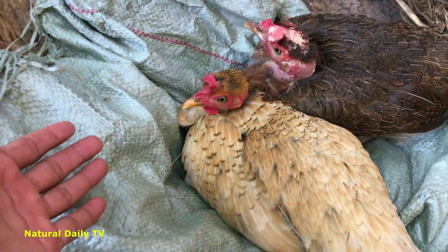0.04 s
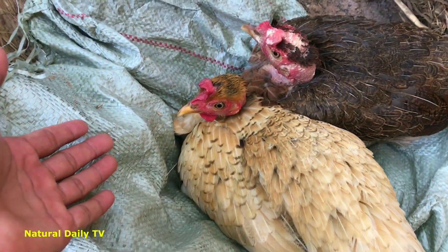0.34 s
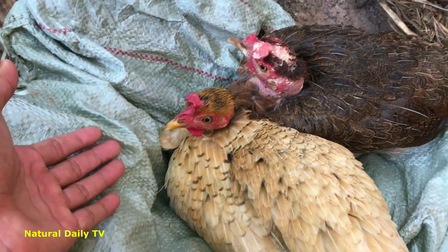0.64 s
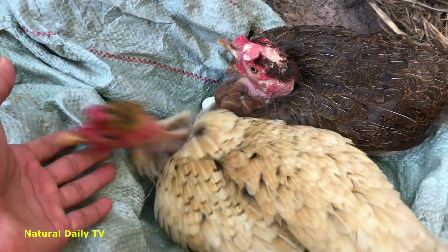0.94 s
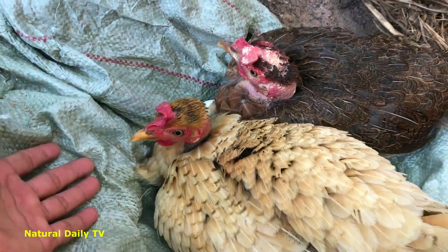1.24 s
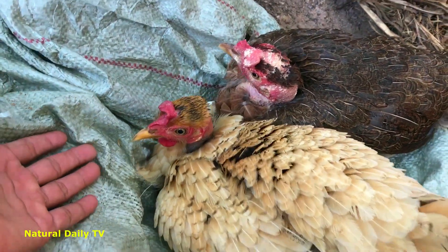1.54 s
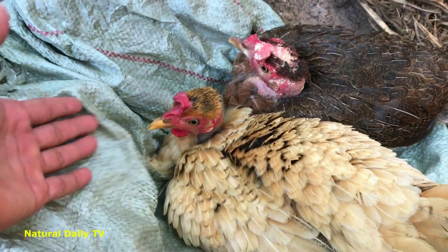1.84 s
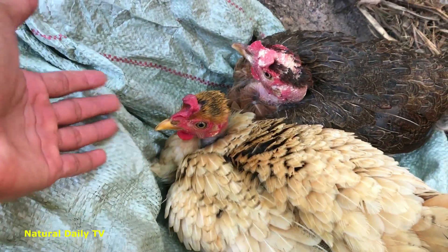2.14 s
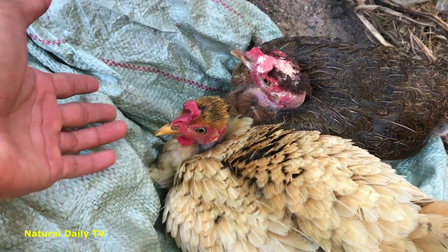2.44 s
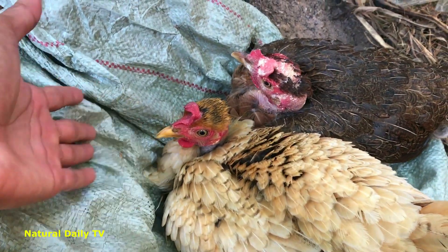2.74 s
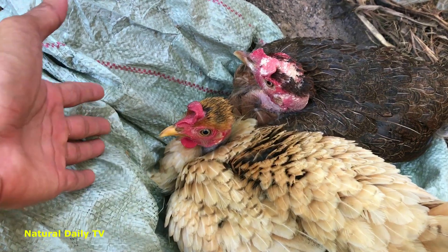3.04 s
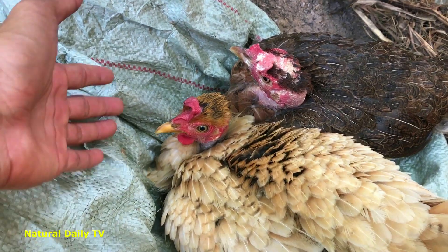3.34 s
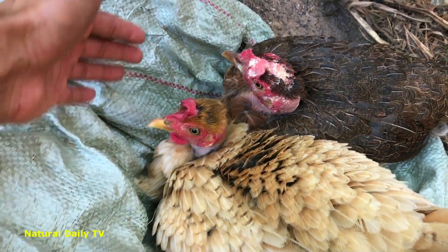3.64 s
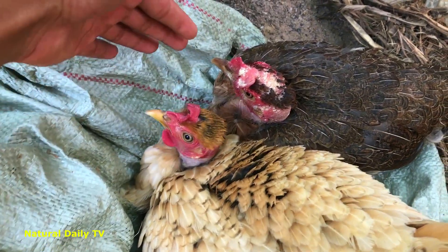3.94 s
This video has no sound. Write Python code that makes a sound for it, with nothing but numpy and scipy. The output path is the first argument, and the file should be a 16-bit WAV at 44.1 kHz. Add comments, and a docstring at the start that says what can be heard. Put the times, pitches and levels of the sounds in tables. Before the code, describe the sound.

Rattling, clucking calls from a hen, with a plastic sack faintly crinkling outdoors.

```python
"""Outdoors, on a woven plastic sack, a sitting hen grumbles at a hand held close to her.
Her phrases open with short whistled clucks and break into rattles: a whistle chopped some
53 times a second, with a snap at each opening. Between phrases she draws air.
The sack rustles, scrapes and ticks under her, over a low outdoor rumble."""
import sys
import numpy as np
from scipy import signal
from scipy.fft import rfft, irfft, next_fast_len
from scipy.io import wavfile
from scipy.ndimage import map_coordinates

SR = 44100
rng = np.random.default_rng(int(sys.argv[2]) if len(sys.argv) > 2 else 0)


def int16_out(signal):
    """Quantize to a 16-bit WAV file."""
    q = np.round(np.clip(np.atleast_2d(signal).T, -1, 1) * 32767)
    wavfile.write(sys.argv[1], SR, q.astype(np.int16))


N = 176400
T = np.arange(N) / SR

EDGE_S, JITTER_S = 0.00301, 0.000696  # a pulse's fade in and out; its uneven timing
OPEN_SHARE, SECOND_SNAP_AT, SQUEAK_AT = 0.916, 0.48, 0.68  # shares of one pulse
SNAP_DB, RASP_DB, CHIRP_DB, SQUEAK_DB = 20.5, -1.5, 4.5, -0.5  # compared with the pulse
# Runs of quick pulses: t/s, length/s, pulse rate/Hz, whistle f/Hz, start, middle and end level/dB,
# start and end harshness (0 to 1), feed to the throat's high notes/dB
RATTLES = [ (.000, 0.079, 56.4, 693, -42.5, -46.5, -55, 0.31, 1, -7),
           (0.093, 0.083, 60, 690, -50, -47, -46.5, 0.44, 0.97, -2),
           (0.448, 0.074, 53, 698, -41.5, -44.5, -54.5, 0.26, 1, -6),
           (0.523, 0.14, 53, 662, -50, -46.5, -49, 0.76, 0.75, 0.5),
           (0.927, 0.043, 33, 726, -41, -56, -50, 0.2, 0.9, 1),
           (1.613, 0.039, 40, 746, -46.5, -65, -36, 1, 0.61, 0),
           (1.71, 0.072, 52.5, 710, -41, -45.5, -38.5, 0.7, 0.4, -6),
           (1.789, 0.035, 58.4, 712, -43, -38.5, -35.5, 0.2, 0.37, -8),
           (1.829, 0.045, 55, 730, -42, -35.5, -46, 0.12, 0.78, -5),
           (2.186, 0.0275, 50, 746, -55, -65, -55, 0.32, .4, -12),
           (2.416, 0.064, 51, 742, -44.5, -37, -39, 0.25, 0.4, -3),
           (2.513, .022, 58, 860, -50, -63, -53, 0.27, 0.2, -7),
           (2.542, 0.041, 56.4, 696, -42.5, -37, -39.5, 0.28, 0.32, -9.5),
           (2.621, 0.062, 54, 688, -48.5, -37.5, -43, 0.37, 0.43, -5),
           (2.702, 0.0287, 41.4, 735.2, -46, -78, -41, 0, 0.3, -9),
           (2.756, 0.057, 58, 730, -43, -38, -45.5, 0.32, 0.56, -4.5),
           (3.393, 0.043, 25.9, 771.5, -48.5, -61, -47, 0.3, 0.53, -18),
           (3.467, 0.054, 58.4, 704, -43.5, -35.5, -42.5, 0.23, 0.38, -8),
           (3.561, 0.062, 56, 704, -46, -37.5, -40.5, 0.27, 0.41, -13),
           (3.84, 0.057, 56.8, 691, -41, -41, -39.5, 0.06, 0.17, -12),
           (3.915, 0.093, 58.7, 694.7, -47.5, -39, -43, 0.05, 0.46, -13)]
def rattles():
    """Each opening lets out a snap and a dipping whistle; harshness adds snap, chirps and rasp."""
    voice, low, high = np.zeros((3, N))
    for onset, length, rate, hz, *levels_db, harsh_from, harsh_to, high_db in RATTLES:
        t = T[:int(SR / rate)]
        for start in np.arange(0, length - EDGE_S, 1 / rate):
            # No two pulses are quite alike.
            late, loud, detune, bend, second_late, squeak_detune, *detunes = rng.standard_normal(8)
            at = onset + start + JITTER_S * late
            harsh = np.interp(start / length, [0, 1], [harsh_from, harsh_to])
            level = amp(np.interp((start + t) / length, [0, .5, 1], levels_db) + 0.72 * loud)
            opening = level * gate(t, min(OPEN_SHARE / rate, length - start), EDGE_S)
            # The pitch starts high, settles, then lifts as the pulse closes.
            settle = 0.3 * np.exp(-t / 0.0024)
            lift = 0.24 * (1 + bend) * np.clip(2 * t * rate - 1, 0, 1) ** 2
            tone = whistle(hz * (1 + 0.044 * detune + settle + lift))
            add(voice, at, amp(-4.5 * harsh) * opening * tone)
            if start + SQUEAK_AT / rate < length:
                squeak = chirp(squeak_detune, from_hz=1248, to_hz=1120)
                add(voice, at + SQUEAK_AT / rate, amp(SQUEAK_DB) * harsh ** 0.98 * level[-1] * squeak)
            rasp = amp(RASP_DB) * harsh ** 1.3 * opening * rng.standard_normal(len(t))
            snaps = [(EDGE_S / 2, np.sqrt(harsh)),
                     (SECOND_SNAP_AT / rate + 2 * JITTER_S * second_late, amp(3) * harsh ** 2)]
            for (delay, force), chirp_detune in zip(snaps, detunes):
                if start + delay < length:
                    i = int(np.clip(delay * SR, 0, len(t) - 1))
                    rasp[i] += amp(SNAP_DB) * force * level[i]
                    peep = chirp(chirp_detune, from_hz=1374, to_hz=954)
                    add(voice, at + delay - EDGE_S / 2, amp(CHIRP_DB) * force * harsh * level[i] * peep)
            add(low, at, rasp)
            add(high, at, amp(high_db) * rasp)
    return voice + throat(low, high)


CATCH_S, CATCH_RATIO = 0.0036, 1.8  # the catch's half-length; second voice's pitch over the first's
# Single clucks, each with a catch (a break in the voice): t/s, length/s, start, catch and end f/Hz,
# time to the catch/s, level/dB, catch above the whistle/dB
CLUCKS = [ (.391, 0.029, 853, 694, 654, 0.022, -41.5, 3), (0.899, 0.026, 782.4, 690, 744, 0.02, -42, 4.5),
          (1.433, 0.032, 840, 718, 1080, .022, -33.5, -6.5), (1.491, 0.03, 965, 756, 933, 0.019, -33.5, -9),
          (1.546, 0.016, 963, 770, 770, 0.018, -35, 7), (1.562, 0.013, 943, 755, 720, 0.012, -32, -13),
          (1.582, 0.015, 966, 680, 696, 0.0086, -40.5, 1), (1.597, 0.017, 790, 780, 763, 0.0019, -33, -6),
          (1.65, 0.022, 835, 717, 728, 0.0073, -34.5, -3), (1.695, .013, 1251, 1190, 1140, .008, -36, -26),
          (2.169, 0.0065, 870, 760, 740, 0.0068, -43.5, -17),
          (2.364, 0.029, 1045, 702.3, 748.6, 0.01, -37, -12),
          (3.144, 0.014, 1165, 830, 660, 0.0083, -49, -27),
          (3.402, 0.029, 1220, 679.8, 680, 0.018, -41.5, -8)]
def clucks():
    """The whistle dips to a catch, where a second voice and a rasp break in."""
    voice, rasp = np.zeros((2, N))
    for onset, length, start_hz, catch_hz, end_hz, catch_at, db, catch_db in CLUCKS:
        t = np.arange(int(length * SR)) / SR
        before = np.clip(1 - t / catch_at, 0, 1) ** 1.28
        after = np.clip((t - catch_at) / max(length - catch_at, EDGE_S), 0, 1)
        hz = catch_hz + (start_hz - catch_hz) * before + (end_hz - catch_hz) * after
        loss_db = 20 * np.log2(hz / catch_hz) ** 2  # weaker away from the catch's pitch
        level = amp(db - loss_db) * gate(t, length, edge_s=0.0053)
        catch = amp(catch_db) * np.exp(-((t - catch_at) / CATCH_S) ** 2)
        add(voice, onset, level * (whistle(hz) + catch * whistle(hz * CATCH_RATIO)))
        add(rasp, onset, level * (amp(-18.5) * catch + amp(-21)) * rng.standard_normal(len(t)))
    return voice + throat(rasp, rasp)


def whistle(hz):
    """A nearly pure tone, with faint overtones at two and three times its pitch."""
    phase = 2 * np.pi * np.cumsum(hz) / SR
    return np.sqrt(2) * (np.sin(phase) + amp(-24.5) * np.sin(2 * phase) + amp(-28.5) * np.sin(3 * phase))


def chirp(detune, from_hz, to_hz, length_s=0.0088):
    """The hen's second voice slides briefly in pitch."""
    t = T[:int(length_s * SR)]
    hz = np.linspace(from_hz, to_hz, len(t)) * (1 + 0.058 * detune)
    return gate(t, length_s, length_s / 2) * whistle(hz)


# The low and high notes at which the throat rings: f/Hz, width/Hz, relative level/dB
THROAT_LOW = [(358.6, 80, -2), (545, 82, 1.5), (642, 106, 2.5), (1003, 139, -1), (1198, 115, -2.5),
              (1330, 79, -8.5)]
THROAT_HIGH = [(1903, 137, -9.5), (2340, 280, -16), (2500, 250, -15), (2870, 74, -26), (3320, 1700, -63)]
def throat(low, high):
    """Snaps and rasp make the throat ring, like a small hollow tube."""
    return amp(21.5) * (resonate(low, THROAT_LOW) + resonate(high, THROAT_HIGH))


# Breaths in: peak t/s, half-length/s, centre f/Hz, half-width/octaves, level/dB
BREATHS = [(0.992, 0.011, 2647, 0.51, -54), (1.98, 0.0082, 2199, 0.37, -57.5),
           (2.828, 0.02, 2260, 0.2, -62), (2.884, 0.047, 1620, 0.22, -64), (3.234, .04, 1530, 0.036, -75),
           (3.684, 0.024, 2066, 0.44, -56.5)]
def breaths():
    """Soft puffs of air through the hen's beak; those with a narrow band of pitches wheeze."""
    out = np.zeros(N)
    for peak, half_length, hz, octaves, db in BREATHS:
        puff = noise(lambda f: -10 * np.log10(1 + (np.log2((f + 1) / hz) / octaves) ** 4))
        out += amp(db) * swell(peak, half_length, half_length) * puff
    return out


# The sack's tone, from bass to treble: f/Hz, level/dB
SACK_TONE = [(880, -18), (1500, -6), (1760, -9.5), (2220, -5.5), (3390, -4.5), (4250, -3.5), (4740, -4),
             (7660, -4), (13700, -1), (15000, -5), (15800, -17.5)]
# How strongly the sack rustles: t/s, level/dB
RUSTLE = [(0.0, -55), (.1, -54.5), (.17, -57.5), (0.33, -54), (0.6, -52.5), (0.75, -52.5), (.88, -55),
          (1.01, -52.5), (1.15, -52), (1.38, -53), (1.49, -58.5), (1.95, -61), (2.12, -63), (2.2, -67.5),
          (2.7, -71), (2.97, -67.5), (3.2, -68.5), (3.45, -72.5), (3.66, -67), (4.0, -70)]
def sack_rustle():
    """Woven plastic hisses and crinkles as it shifts."""
    hiss = amp(-1.5) * toned_noise(SACK_TONE)
    crackle = crinkles(per_s=170, spread_db=0.5) * toned_noise(SACK_TONE)
    rustle_db = curve(RUSTLE)
    crackle_db = -2.5 + 0.04 * (rustle_db.max() - rustle_db)  # crinkles fade less than the hiss
    flutter_db = 1.1 * wobble(per_s=39.83)
    return amp(rustle_db + flutter_db) * (hiss + amp(crackle_db) * crackle)


# Short slides: peak t/s, rise/s, fall/s, level/dB, treble tilt/dB per octave
SCRAPES = [(1.19, .02, 0.041, -47.5, -2.5), (2.03, 0.025, 0.038, -55.5, -1.5),
           (2.275, .04, 0.036, -60.5, 1), (2.484, .024, 0.013, -53.5, 0), (2.528, 0.017, 0.016, -56, 3.5),
           (2.772, .02, .018, -59.5, -0.5), (2.818, 0.032, 0.064, -56, 0), (3.34, .005, 0.019, -60, -1.5),
           (3.568, 0.011, .016, -61.5, 0)]
def sack_scrapes():
    """The sack slides in short swells of crackle over an even hiss."""
    grains = unit(crinkles(per_s=220, spread_db=-0.5) + 1)
    return sum(amp(db) * swell(peak, rise, fall) * grains * toned_noise(SACK_TONE, tilt)
               for peak, rise, fall, db, tilt in SCRAPES)


# A tick's tone: f/Hz, level/dB
TICK_TONE = [(300, -5.5), (1500, -7), (4500, -7), (12000, -11), (15500, -11.5)]
# Snapping creases: t/s, relative level/dB, time to fade by 60 dB/s, treble tilt/dB per octave
TICKS = [(0.0624, -32.5, 0.016, 0), (0.119, -35, 0.027, -2.5), (0.377, -32, 0.0093, 0.5),
         (0.432, -28.5, 0.0082, 3.5), (.828, -32.5, 0.008, -1), (1.1599, -26.5, 0.02, 0.5),
         (1.2572, -26, .004, 9), (1.404, -28, 0.0045, 3), (1.765, -35, 0.011, 6), (1.998, -37, 0.035, 5),
         (2.231, -42.5, 0.011, 2), (2.327, -33, 0.0043, 5), (2.489, -33, 0.0095, 3),
         (2.525, -29.5, 0.02, 6), (2.621, -39.5, 0.012, 3), (2.633, -40, 0.011, 0),
         (2.772, -30.5, 0.0091, 10), (2.848, -38, 0.0051, -1), (2.861, -38, .005, 3),
         (3.098, -36.5, 0.0099, 1.5), (3.115, -33.5, 0.0052, 5), (3.206, -33, 0.0045, 8.5),
         (3.374, -33.5, 0.0098, 2.5), (3.382, -33, 0.0092, 6), (3.555, -35.5, 0.008, 3),
         (3.56, -35.5, 0.0076, 4.5)]
def sack_ticks():
    """A crease snaps with a burst of noise that dies away fast."""
    out, t = np.zeros(N), T[:SR // 20]
    for onset, db, fade_s, tilt in TICKS:
        add(out, onset, amp(db - 60 * t / fade_s) * toned_noise(TICK_TONE, tilt, len(t)) / 2)
    return out


def yard_echo(sound, fade_s=0.078, db=-12.5):
    """A short, weak echo from the ground and things nearby."""
    t = T[:SR // 3]
    tail = rng.standard_normal(len(t)) * amp(-60 * t / fade_s) * (t > .004)
    return amp(db) * signal.fftconvolve(sound, tail / np.linalg.norm(tail))[:N]


# How the rumble rises and falls: t/s, relative level/dB
RUMBLE = [(0.0, -57), (0.05, -47), (0.83, -52), (1.39, -45), (1.41, -49), (3.36, -53), (3.42, -66),
          (3.46, -48), (3.92, -52), (4.0, -57)]
# The tones of the rumble and of the faint hush: f/Hz, level/dB
RUMBLE_TONE = [(22, -54), (28, -28), (36, 0.5), (48, -5.5), (64, 5), (90, 0.5), (110, -9), (170, -13.5),
               (250, -27), (500, -53)]
HUSH_TONE = [(60, 9), (180, 3), (260, 2), (700, 2.5), (1500, -3.5), (4000, -15), (15000, -62)]
def outdoors():
    """A low rumble, and a faint hush that partly follows the rustle's loudness."""
    rustle_db = curve(RUSTLE)
    hush = amp(-61.5 + 0.54 * (rustle_db - rustle_db.mean())) * toned_noise(HUSH_TONE)
    return hush + amp(curve(RUMBLE) + 0.6) * toned_noise(RUMBLE_TONE)


def crinkles(per_s, spread_db, fade_s=0.011):
    """The loudness of a stream of tiny snaps of uneven size."""
    sizes = amp(spread_db * np.clip(rng.standard_normal(N), -2, 2))
    snaps = sizes * (rng.random(N) < per_s / SR)
    return unit(signal.fftconvolve(snaps, amp(-60 * T[:SR // 20] / fade_s))[:N])


def resonate(x, notes):
    """Let x set a group of notes ringing."""
    size = next_fast_len(N + SR // 4)
    f = np.fft.rfftfreq(size, 1 / SR)
    response = sum((-1) ** k * amp(db) * 1j * f * width / (hz * hz - f * f + 1j * f * width)
                   for k, (hz, width, db) in enumerate(notes))
    return irfft(rfft(x, size) * response, size)[:N]


def toned_noise(tone, tilt=0, size=N):
    """Noise shaped by a tone table; tilt adds dB per octave above 1000 Hz."""
    hz, db = np.transpose(tone)
    return noise(lambda f: np.interp(np.log(f + 1), np.log(hz + 1), db)
                 + tilt * np.log2(np.maximum(f, 1000)), size)


def noise(db_at, size=N):
    """Noise whose strength at each frequency follows db_at."""
    gains = amp(db_at(np.fft.rfftfreq(size, 1 / SR)))
    return unit(irfft(rfft(rng.standard_normal(size)) * gains, size))


def wobble(per_s):
    """A smooth random curve."""
    return map_coordinates(rng.standard_normal(int(N * per_s / SR) + 4), [T * per_s])


def swell(peak, rise, fall):
    """A bell-shaped rise and fall."""
    return np.exp(-((T - peak) / np.where(T < peak, rise, fall)) ** 2 / 2)


def gate(t, length, edge_s):
    """Fade in, hold, fade out."""
    fade_in = np.sin(np.pi / 2 * np.clip(t / edge_s, 0, 1))
    return fade_in * np.sin(np.pi / 2 * np.clip((length - t) / edge_s, 0, 1))


def curve(rows):
    """Join (time, value) points with straight lines."""
    return np.interp(T, *np.transpose(rows))


def add(track, at, x):
    """Mix x into the track at a time in seconds."""
    part = track[max(0, round(at * SR)):][:len(x)]
    part += x[:len(part)]


def amp(db):
    """Turn decibels into a multiplier."""
    return 10 ** (np.asarray(db) / 20)


def unit(x):
    """Scale x to an average strength (rms) of 1."""
    return x / np.sqrt(np.mean(x ** 2) + 1e-20)


def scene():
    """The hen on her sack, outdoors."""
    hen = rattles() + clucks() + breaths()
    sack = sack_rustle() + sack_scrapes() + sack_ticks()
    return (hen + sack + yard_echo(hen) + outdoors())[None]


def record(dry, top_hz=15800):
    """Cut away the very highest treble."""
    return irfft(rfft(dry) * (np.fft.rfftfreq(N, 1 / SR) < top_hz), N)


dry = scene()
out = record(dry)
int16_out(out)
```